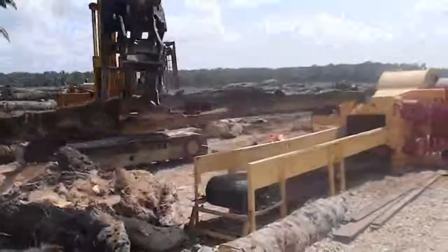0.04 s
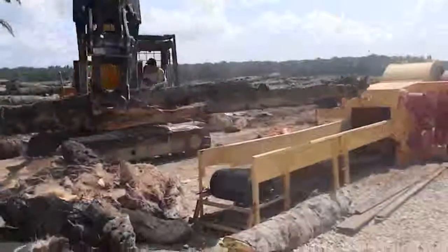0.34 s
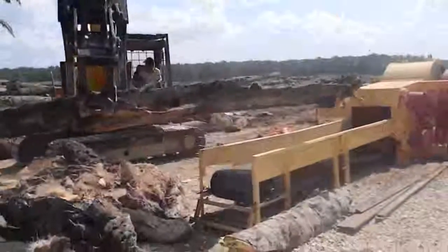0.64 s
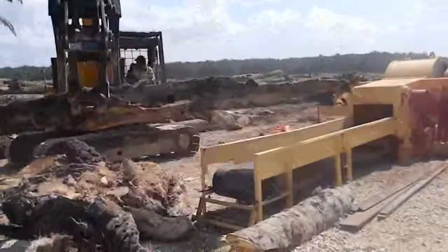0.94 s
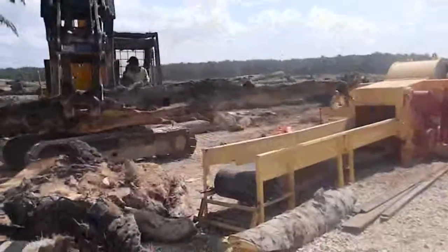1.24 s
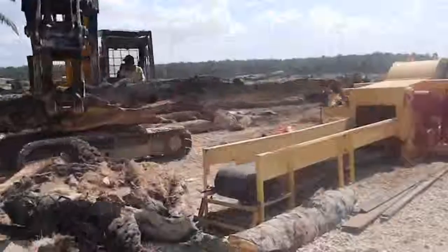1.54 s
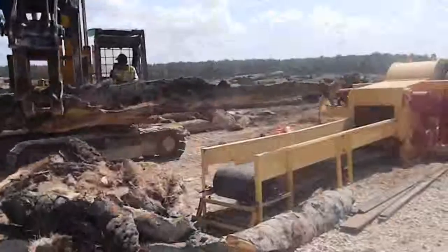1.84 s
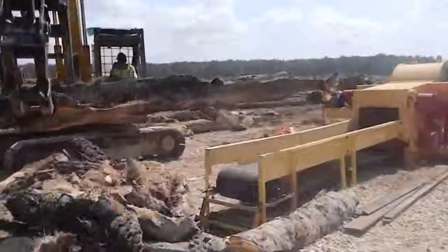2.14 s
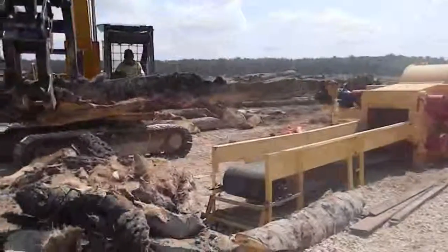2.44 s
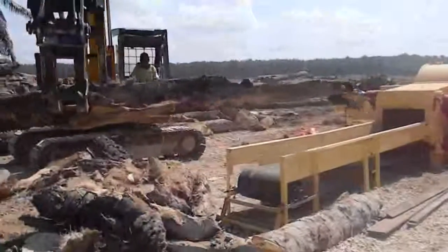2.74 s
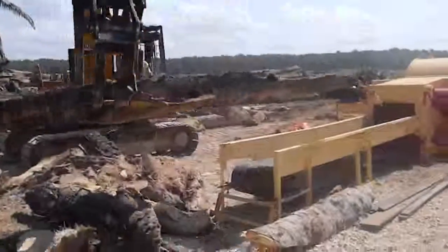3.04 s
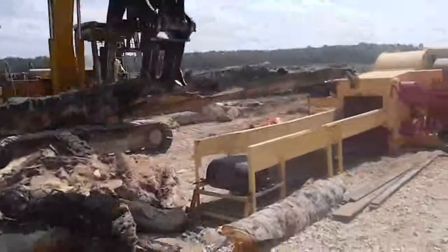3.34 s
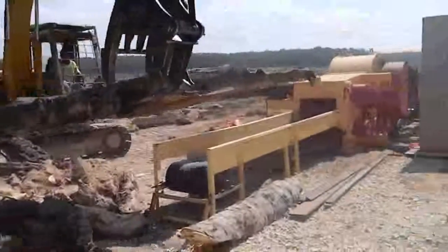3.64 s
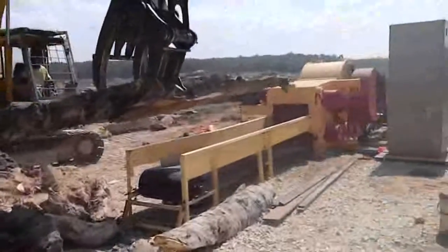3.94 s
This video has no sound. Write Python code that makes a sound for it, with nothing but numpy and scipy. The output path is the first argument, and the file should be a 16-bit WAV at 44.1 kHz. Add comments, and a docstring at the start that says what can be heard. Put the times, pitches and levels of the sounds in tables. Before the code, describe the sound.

A big diesel wood chipper runs steadily outdoors, with a throbbing roar, rushing fan and thin whistle. Its knives growl and knock on a log at first, ease off, then bite again, with brief cracks and hisses of chips.

```python
"""A big diesel wood chipper runs at a steady speed in an open log yard. Its exhaust roars and throbs
as the cylinders fire, over a rushing fan, clattering valves, whining gears and a thin turbo whistle.
A log is pressed on its drum: the knives beat on the wood in a hollow growl, with hard bites that make
the log knock. The log jolts and splits, chips hiss out of the chute and the steel casing rings faintly.
The sound is almost the same in both ears; only the treble spreads out."""
import sys
import numpy as np
from scipy import signal
from scipy.fft import rfft, irfft, next_fast_len
from scipy.io import wavfile
from scipy.ndimage import map_coordinates

SR = 44100
rng = np.random.default_rng(int(sys.argv[2]) if len(sys.argv) > 2 else 0)


def store_wav(level_fs):
    """Save 16-bit WAV to argv[1]."""
    pcm = np.round(np.clip(np.atleast_2d(level_fs), -1, 1) * 32767)
    wavfile.write(sys.argv[1], SR, pcm.T.astype(np.int16))


N = 176400  # 4 seconds

CYCLE_HZ, CYLINDERS = 12.683, 6  # in one engine cycle, every cylinder fires once
KNIFE_HZ = 2 * CYCLE_HZ  # two knives, one cut each per cycle


def exhaust(cycle):
    """The exhaust roars low and throbs with each firing; two chugging hums swell along with it."""
    # tone colour of the roar: f/Hz, level/dB
    roar_colour = [(15, -42), (30, -41), (42, -36), (52, -24), (65, -8), (85, -7), (100, 2), (130, 0.5),
                   (148, -1.5), (180, -1), (225, -3), (265, -11), (330, -21), (600, -36), (2000, -72)]
    # the machine's two strong hums: f/Hz, level/dB
    hum_tones = [(125.5, -26.5), (202.8, -23.5)]
    # how roar and hums swell and dip: t/s, level/dB
    swells = [(0.0, -18.5), (0.14, -17), (.3, -21.5), (0.42, -17), (0.48, -28), (0.51, -16.5), (0.67, -20),
              (0.71, -30), (0.735, -19.5), (.83, -19.5), (1.0, -21), (1.12, -18), (1.2, -18.5), (1.7, -17),
              (1.77, -21), (1.795, -26), (1.83, -23), (1.96, -14.5), (2.01, -18.5), (2.27, -17),
              (2.35, -22), (2.39, -17.5), (2.62, -17.5), (2.69, -18.5), (2.76, -19.5), (3.0, -18),
              (3.14, -25.5), (3.26, -30), (3.31, -20), (3.36, -22), (3.42, -19), (4.0, -17.5)]
    roar_db, throb_depth = -21, 0.36
    throb = 1 + throb_depth * np.cos(2 * np.pi * CYLINDERS * cycle)
    hums = 0
    for hz, db in hum_tones:
        chug_db = wobble(25.88)
        hums += amp(db + chug_db) * sine(hz * cycle / CYCLE_HZ + 0.031 * wobble(9.3))
    roar = amp(roar_db) * noise(roar_colour, throb)
    return amp(curve(swells) + 19) * (roar + hums)  # a swell of -19 dB leaves the level as it is


def knives():
    """Each knife tears at the log for a moment, so the log and the drum housing ring hollow."""
    # how hard the log is being cut: t/s, level/dB
    cutting = [(0, -12.5), (.12, -24), (.22, -29), (.33, -17.5), (.48, -16.5), (.6, -26), (.65, -22.5),
               (.7, -17), (.85, -28), (.95, -21.5), (1.06, -30), (1.7, -34), (1.79, -19), (1.92, -28.5),
               (2.2, -30.5), (2.62, -39), (2.82, -23), (2.89, -17.5), (3.06, -17.5), (3.13, -21),
               (3.28, -17), (3.4, -24), (3.48, -20.5), (4, -26)]
    # hollow ring of log and housing: f/Hz, level/dB
    hollow_colour = [(120, -55), (270, -15.5), (335, -1.5), (385, 1.5), (440, -1.5), (500, -6.5),
                     (570, -11), (700, -18.5), (1000, -27), (2000, -45), (5000, -60)]
    scatter_s, scatter_db, fade_s = 0.003, 0.4, 0.059
    timing, force = rng.standard_normal((160, 2)).T  # no two cuts are quite alike
    starts = np.arange(len(timing)) / KNIFE_HZ + scatter_s * timing
    blows = np.bincount(np.abs(starts * SR).astype(int), amp(scatter_db * force), N)[:N]
    tearing = signal.lfilter([1], [1, -np.exp(-1 / (fade_s * SR))], blows)  # each blow dies away
    return amp(curve(cutting) + 1) * noise(hollow_colour, tearing)


def bites():
    """A hard bite makes the log knock; the pitch depends on where it is hit and sags as the cut opens."""
    # hard bites of the knives: t/s, level/dB, f/Hz, sag/share of the pitch
    hard_bites = [(0.017, -11, 410, 0.063), (.335, -18.5, 428, 0), (.353, -14.5, 553, 0.076),
                  (.351, -9.5, 384, 0.055), (.448, -10, 410, .15), (.5, -11.5, 400, 0.034),
                  (0.557, -15, 385, 0.015), (.612, -9, 409, 0.026), (.707, -14, 527, 0),
                  (.98, -9.5, 433, 0.2), (1.002, -14.5, 363, 0.16), (1.125, -21, 420, 0),
                  (1.765, -17, 400, 0.039), (2.794, -11.5, 328, 0.047), (3.011, -4, 395, 0.012),
                  (3.0285, -11, 391.6, 0.041), (3.049, -15.5, 537, 0.021), (3.083, -11, 362, 0.042),
                  (3.172, -16, 396, 0.082), (3.213, -18, 420, 0.047), (3.262, -9.5, 392, 0.051),
                  (3.535, -20, 374, .05), (3.729, -13.5, 412, 0.016), (3.978, -15.5, 392, 0)]
    # the log's own tones: ratio to the pitch, level/dB, time to fade by 60 dB/s
    log_tones = [(.86, -10.5, 0.054), (1.002, 0.5, 0.081), (1.17, -7, 0.066), (1.42, -12.5, 0.067),
                 (1.8, -15, 0.047)]
    attack_s, sag_s, gain_db = 0.0044, 0.0323, 4.5
    knocks = np.zeros(N + SR)
    t = np.arange(SR // 4) / SR
    attack = 1 - np.exp(-t / attack_s)
    for start, db, hz, sag in hard_bites:
        pitch = hz * (1 - sag * (1 - np.exp(-t / sag_s)))
        turns = np.cumsum(pitch) / SR
        ring = np.sqrt(2) * sum(amp(level - 60 * t / fade_s) * np.sin(2 * np.pi * ratio * turns)
                                for ratio, level, fade_s in log_tones)
        knocks[int(start * SR):][:len(t)] += amp(db + gain_db) * ring * attack
    return knocks[:N]


def fan_rush(cycle):
    """Fan and engine block give a broad rush that pulses with the firings; its treble flickers."""
    # tone colour of the rush: f/Hz, level/dB
    rush_colour = [(100, 3), (300, -1.5), (450, 4), (700, 3.5), (1000, 0.5), (1550, -1.5), (2000, -5),
                   (2500, -7), (3400, -10.5), (3600, -14.5), (3830, -10), (4100, -13.5), (5000, -17),
                   (6500, -19), (8000, -30), (8800, -22.5), (12000, -31.5), (15500, -31.5)]
    # slow rise and fall of the treble: t/s, level/dB
    treble_shape = [(0, -35), (.06, -36.5), (.36, -37.5), (.43, -39.5), (.5, -36), (.6, -38), (1.0, -37.5),
                    (1.44, -37), (1.62, -37.5), (1.75, -36.5), (2.7, -37.5), (2.88, -38), (2.95, -37.5),
                    (3.12, -39), (3.38, -37.5), (3.72, -36), (3.78, -38), (4, -36)]
    rush_db, treble_hz, fizz_hz = -27, 3000, 5600
    angle = 2 * np.pi * cycle
    firing = CYLINDERS * angle
    pulse = 1 + 0.059 * np.cos(firing) + 0.049 * np.cos(2 * firing) + 0.046 * np.cos(angle)
    air = amp(rush_db + 0.56 * wobble(14)) * noise(rush_colour, pulse)
    treble = filtered(air, lambda hz: high_pass(hz, treble_hz, steepness=4))
    fizz = filtered(treble, lambda hz: high_pass(hz, fizz_hz, steepness=8))
    flickering = (treble - fizz) * amp(2.3 * wobble(24.93)) + fizz * amp(2 * wobble(35.06))
    level = curve(treble_shape)
    return air - treble + flickering * amp(1.7 * (level - level.mean()))


def gears_and_valves(cycle):
    """Gears whine roughly, while valves and fuel injectors repeat the same clatter every cycle."""
    # engine and gear tones: multiple of the cycle rate, level/dB
    gear_tones = [(6, -45), (7, -36), (18, -39.5), (81, -49), (90, -48), (115, -46.5), (120, -43),
                  (152, -49), (156, -47)]
    # tone colour of the clatter: f/Hz, level/dB
    clatter_colour = [(300, -14), (800, -13), (1400, -4.5), (1900, -7), (2300, -13), (3000, -32.5),
                      (4200, -23), (7000, -33.5)]
    swell_db, rough_db, clatter_db = 2.9, 0.5, -39.5
    whine = 0
    for multiple, db in gear_tones:
        gain = amp(db + swell_db * wobble(4.85) + rough_db * wobble(70))
        whine += gain * sine(multiple * cycle + 0.038 * wobble(45))
    size = 4096  # points in one cycle of clatter
    hz = np.arange(size // 2 + 1) * CYCLE_HZ
    one_cycle = irfft(rfft(rng.standard_normal(size)) * amp(along(clatter_colour, hz)))
    clatter = unit(map_coordinates(one_cycle, [cycle % 1 * size], mode="grid-wrap"))
    return whine + amp(clatter_db) * clatter


def thuds():
    """Each jolt of the log in the feed gives one dull, low push."""
    # jolts of the log: t/s, level/dB
    jolts = [(.725, -24), (1.01, -31), (3.055, -27), (3.21, -33)]
    thud_hz, rise_s = 38.3, 0.0066
    return sum(amp(db) * burst(start, rise_s) * sine(thud_hz * (clock() - start)) for start, db in jolts)


def cracks():
    """The wood splits with a short, bright rasp."""
    # moments when the wood splits: t/s, level/dB
    splits = [(.295, -32), (1.395, -29.5), (2.2, -29), (3.329, -29)]
    # tone colour of splintering wood: f/Hz, level/dB
    splinter_colour = [(200, -50), (600, -20), (1200, -2), (1650, 8), (2300, -6), (5000, -22), (14000, -62)]
    return sum(amp(db) * burst(start, rise_s=0.0075) for start, db in splits) * noise(splinter_colour)


def chips():
    """Chips fly out of the chute in short, grainy gusts."""
    # gusts of chips: t/s at the peak, level/dB, width/s
    sprays = [(0.274, -44, .04), (0.718, -35, 0.025), (0.913, -41.5, .035), (1.417, -37, 0.041),
              (2.205, -46, .02), (3.502, -35.5, 0.016), (3.706, -41, 0.038)]
    # tone colour of flying chips: f/Hz, level/dB
    chip_colour = [(500, -15), (1400, -14), (3500, 14), (6000, 6), (10000, -3), (15000, -52)]
    gusts = sum(amp(db) * np.exp(-0.5 * ((clock() - peak) / width) ** 2) for peak, db, width in sprays)
    grains = amp(1.7 * wobble(300))
    return gusts * noise(chip_colour, grains)


def turbo():
    """The turbo whistles in a band of airy hiss; more boost makes both louder and the whistle higher."""
    # rise and fall of the whistle: t/s, level/dB
    whistle_shape = [(0, -51), (.12, -47.5), (.47, -46), (.9, -46), (1.02, -50), (1.15, -46.5), (1.5, -46),
                     (1.75, -50.5), (2.15, -52.5), (2.23, -42.5), (2.32, -49.5), (2.46, -46), (2.6, -53),
                     (3.1, -55.5), (3.32, -46.5), (3.52, -46), (3.7, -52.5), (4, -51)]
    # narrow band of hiss around the whistle: f/Hz, level/dB
    air_colour = [(6000, -60), (7150, -35), (7310, -11), (7420, 7), (7500, 5), (7560, 21), (7630, -10),
                  (7720, -31), (9000, -70)]
    whistle_hz, wander_hz, hz_per_db, flutter_db = 7507, 6.92, 1.4, 3
    level = curve(whistle_shape)
    boost_db = level - level.mean()
    turns = np.cumsum(whistle_hz + hz_per_db * boost_db + wander_hz * wobble(23)) / SR
    mid, side = [amp(level + db + flutter_db * wobble(30)) * sine(turns) for db in (-2, -12)]
    air = amp(-50 + 0.38 * boost_db) * noise(air_colour)
    return stereo(mid, side) + air


def casing():
    """The shaken steel casing rings faintly, in blurred tones that come and go."""
    # the casing's own tones: f/Hz, level/dB
    steel_tones = [(2966, -60), (3359, -54), (3830, -57.5), (6465, -65)]
    swell_db, blur_turns = 2.5, 0.42
    return sum(amp(db + swell_db * wobble(5.56)) * sine(hz * clock() + blur_turns * wobble(90))
               for hz, db in steel_tones)


def amp(db):
    """Turn decibels into a number to multiply by."""
    return 10 ** (np.asarray(db) / 20)


def unit(x):
    """Scale a sound to an average strength (rms) of 1."""
    return x / np.sqrt(np.mean(x ** 2) + 1e-20)


def along(points, hz):
    """Join (f/Hz, value) points with lines on a logarithmic frequency scale."""
    f, values = np.transpose(points)
    return np.interp(np.log(hz + 1), np.log(f + 1), values)


def clock():
    """The time of each sample, in seconds."""
    return np.arange(N) / SR


def curve(points):
    """Join (t/s, value) points with straight lines."""
    return np.interp(clock(), *np.transpose(points))


def burst(start, rise_s):
    """A shape that climbs from 0 to 1 in rise_s seconds, then dies away."""
    age = np.maximum(clock() - start, 0) / rise_s
    return age * np.exp(1 - age)


def wobble(rate):
    """A smooth curve through `rate` random values a second."""
    return map_coordinates(rng.standard_normal(2048), [clock() * rate], mode="wrap")


def sine(turns):
    """A tone of average strength 1 that starts at a random point of its wave."""
    return np.sqrt(2) * np.sin(2 * np.pi * (turns + rng.random()))


def high_pass(hz, edge_hz, steepness):
    """A gain near 0 well below the edge and near 1 well above it."""
    return 1 - 1 / (1 + (hz / edge_hz) ** steepness)


def filtered(x, response):
    """Multiply each frequency in x by the gain response(hz)."""
    size = next_fast_len(N + SR // 2)
    return irfft(rfft(x, size) * response(np.fft.rfftfreq(size, 1 / SR)), size)[..., :N]


def stereo(mid, side):
    """Make left and right from a shared part (mid) and an opposite part (side)."""
    return np.array([mid + side, mid - side])


def noise(colour, loudness=1):
    """Stereo noise, shaped in time by loudness, then coloured and scaled to an average strength of 1."""
    # how alike left and right are: f/Hz, likeness (1 or more means the same)
    likeness = [(250, 2), (500, 1.62), (1400, 1.8), (2400, 1.23), (4000, 0.68), (8000, 0.35), (14000, 0.56)]

    def response(hz):
        spread = np.arccos(np.clip(along(likeness, hz), -1, 1)) / 2
        return amp(along(colour, hz)) * [np.cos(spread), np.sin(spread)]

    mid, side = filtered(rng.standard_normal((2, N)) * loudness, response)
    return unit(stereo(mid, side))


def scene():
    """One crankshaft times the exhaust, fan and gears; the sounds of cutting go on top."""
    speed_hz = CYCLE_HZ * (1 + 0.00052 * wobble(3.136))  # the speed wanders very slightly
    cycle = np.cumsum(speed_hz) / SR  # engine cycles so far
    machine = exhaust(cycle) + gears_and_valves(cycle) + fan_rush(cycle) + turbo() + casing()
    return machine + knives() + bites() + thuds() + cracks() + chips()


def record(dry):
    """The microphone loses deep bass and the highest treble; its left side is a little brighter."""
    # how much louder left is than right: f/Hz, level/dB
    balance = [(2000, 0.0024), (4000, 0.046), (8000, 3.1), (13000, 0.72)]
    low_hz, top_hz = 30, 15750

    def response(hz):
        left_right = amp(along(balance, hz) * np.array([[0.5], [-0.5]]))
        return high_pass(hz, low_hz, steepness=4) * left_right * (hz < top_hz)

    return filtered(dry, response)


dry = scene()
out = record(dry)
store_wav(out)
```